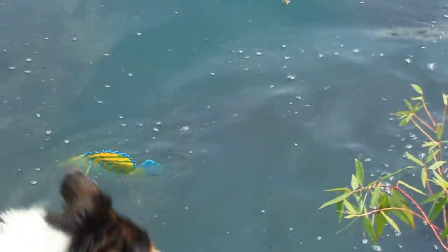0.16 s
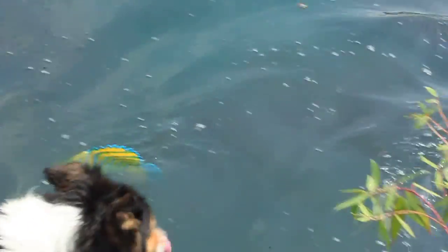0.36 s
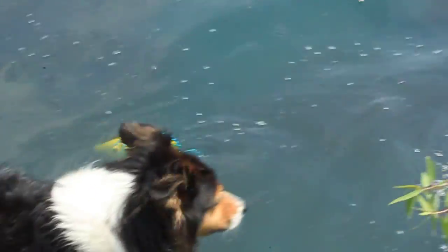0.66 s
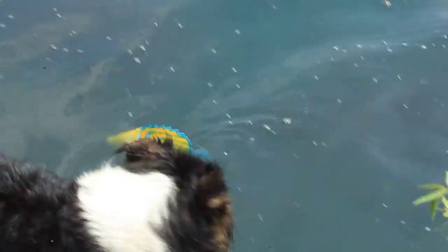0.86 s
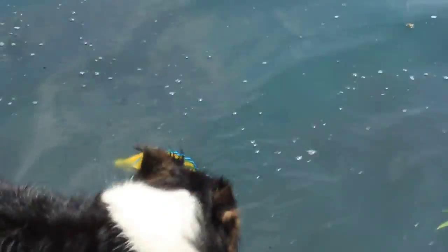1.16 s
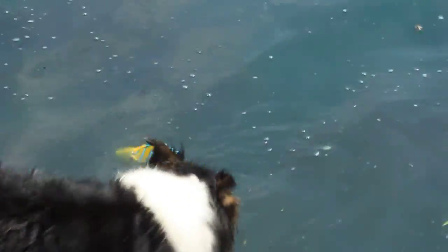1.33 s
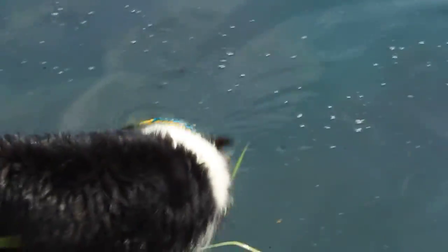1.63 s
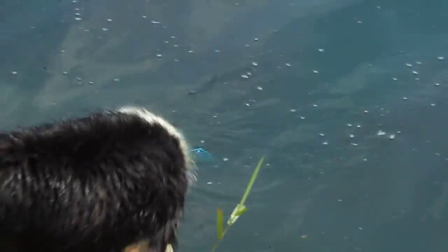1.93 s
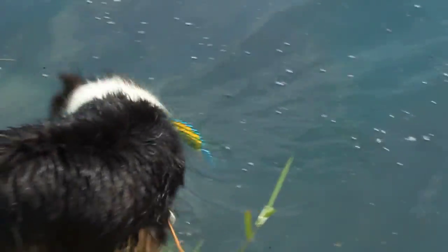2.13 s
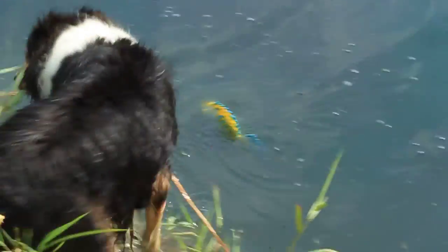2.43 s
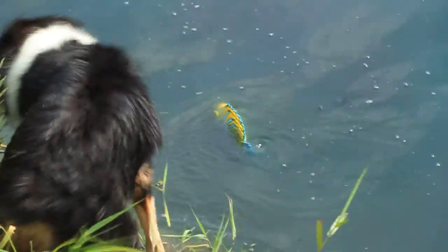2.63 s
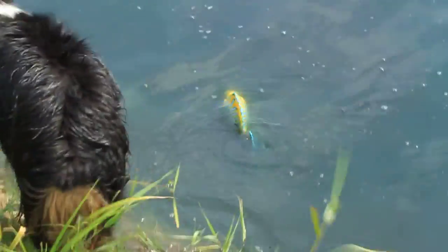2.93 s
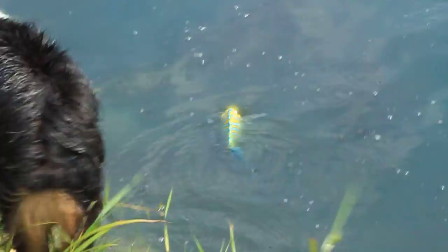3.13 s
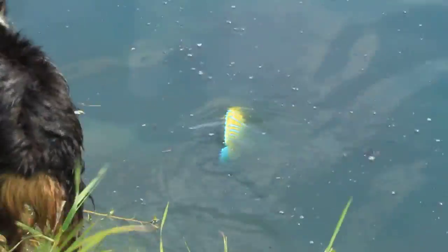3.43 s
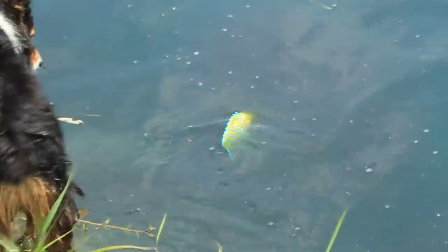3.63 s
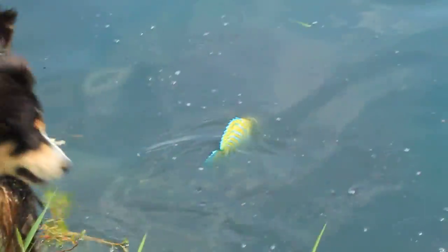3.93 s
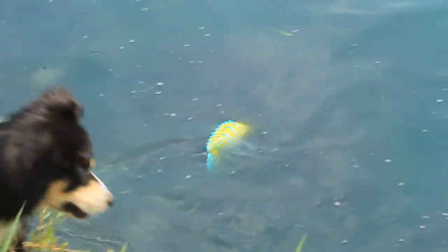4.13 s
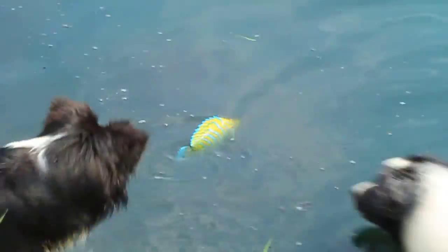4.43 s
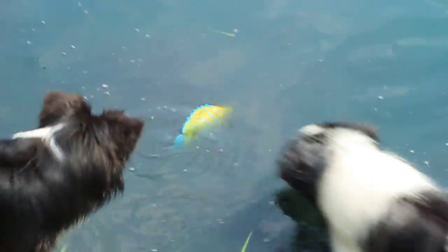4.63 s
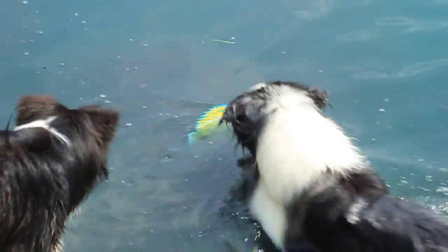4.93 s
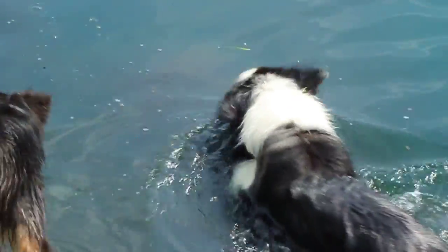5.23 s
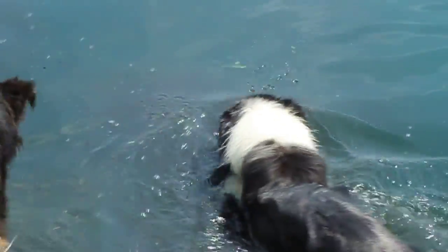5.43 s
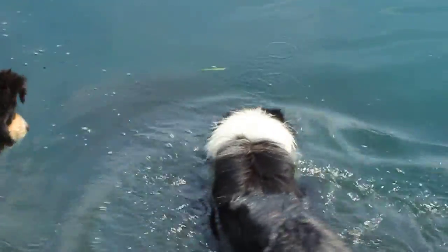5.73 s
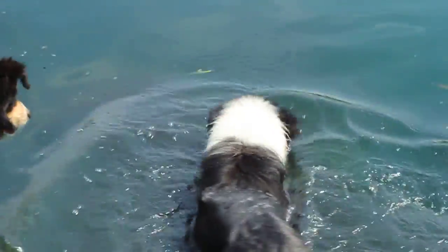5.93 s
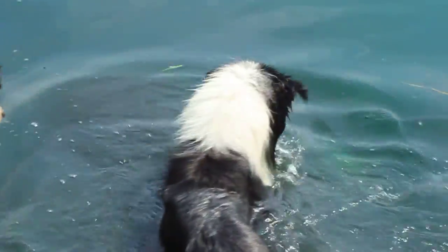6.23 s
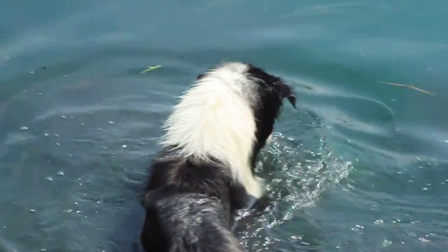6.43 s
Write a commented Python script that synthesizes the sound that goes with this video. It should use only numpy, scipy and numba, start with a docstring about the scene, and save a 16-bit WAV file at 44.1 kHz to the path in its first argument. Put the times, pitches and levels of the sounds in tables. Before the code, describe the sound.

Close, irregular sloshing and bubbly splashes from dogs in shallow water, with wind thumps and a faint bird trill.

```python
"""Lake edge: dogs wade and paddle a step or two from a hand-held camera.
Legs slap and churn the water into ringing bubbles; spray patters back; a few drops tap the camera.
Gusts buffet the microphone. The zoom motor whines faintly near the end.
A small bird trills far off over an outdoor hush."""
import sys
import numpy as np
from scipy import signal
from scipy.fft import rfft, irfft
from scipy.io import wavfile
from numba import njit

SR = 44100
rng = np.random.default_rng(int(sys.argv[2]) if len(sys.argv) > 2 else 0)


def generate_wav(signal):
    """Clip the signal to [-1, 1] and save it as 16-bit WAV at the path in sys.argv[1]."""
    frames = np.transpose(np.atleast_2d(signal))
    scaled = np.clip(frames, -1, 1) * 32767
    pcm = np.round(scaled).astype(np.int16)
    wavfile.write(sys.argv[1], SR, pcm)


N = 289296


def stroke_level_db(layer, attack_s=.071, slosh_per_s=20, slosh_db=1.87):
    """Level of one water layer: leg strokes build, hold and decay over lapping, sloshing unevenly."""
    # leg strokes: start_s, push_s, churn_db, gurgle_db, spray_db
    strokes = [(.53, 0.073, -54, -65, -56), (.68, 0.12, -57, -57, -47.5), (.92, .14, -41, -47, -40),
               (1.2, 0.28, -43.5, -57, -43), (1.62, 0.088, -42, -48.5, -51.5),
               (1.9, .04, -49.5, -53, -50.5), (2.03, 0.1, -42, -49, -50.5),
               (2.28, 0.052, -39.5, -47.5, -44), (2.41, 0.16, -37.5, -44, -48.5),
               (2.65, 0.1, -36, -35.5, -45.5), (2.85, 0.079, -31.5, -40, -41), (2.98, 0.27, -35, -38, -47),
               (3.39, 0.048, -39, -67, -44), (3.6, 0.082, -47.5, -50, -49.5), (3.78, 0.14, -47, -61, -56),
               (4.22, 0.11, -45.5, -50, -52.5), (4.42, 0.14, -48, -43.5, -65), (4.73, .09, -41, -49, -55.5),
               (4.9, 0.18, -41, -44, -53), (5.16, 0.06, -41, -44, -55), (5.42, 0.16, -47.5, -48.5, -53.5),
               (5.72, .03, -49.5, -54, -54), (6.12, 0.19, -47, -50, -55)]
    column, lap_db, release_s, lag_s = {
        "churn": (2, -55, .07, 0), "gurgle": (3, -58, .07, 0), "spray": (4, -54, .19, .0074)}[layer]
    t = np.arange(N) / SR - lag_s
    power = np.full(N, undb(lap_db) ** 2)
    for stroke in strokes:
        start_s, push_s = stroke[:2]
        attack = np.clip(1 + (t - start_s) / attack_s, 0, 1)
        release = np.exp(-np.maximum(t - start_s - push_s, 0) / release_s)
        power += (undb(stroke[column]) * attack * release) ** 2
    slosh = np.tanh(rng.standard_normal(int(slosh_per_s * N / SR)))
    return 10 * np.log10(power) + slosh_db * stretch(slosh, N)


def churn():
    """Stirred water: small bubbles ring over a soft wash."""
    # churn spectrum: freq_hz, gain_db
    spectrum = [(500, -23), (1000, -27.5), (1500, -7.5), (2300, -5.5), (3200, -4.5), (4500, -6.5),
                (6000, -11.5), (7500, -62), (11000, -41)]
    level_db = stroke_level_db("churn")
    air = cloud(level_db, max_per_s=4200, low_hz=1000, high_hz=6500, cycles=22, spread_db=4.4, rise=.22)
    wash = undb(-4) * rng.standard_normal(N)
    return colour(air + wash, spectrum) * undb(level_db - 3.5)


def gurgle():
    """Large air pockets, pushed under by the legs, ring low."""
    level_db = stroke_level_db("gurgle")
    air = cloud(level_db, max_per_s=900, low_hz=413, high_hz=1514, cycles=13, spread_db=4, rise=.29)
    return air * undb(level_db - 4.5)


def spray():
    """Fine drops fall back and tick on the surface."""
    # spray spectrum: freq_hz, gain_db
    spectrum = [(1500, -6.5), (3000, -1.5), (4500, 2), (6000, 2), (7500, -1), (9000, -2.5), (12000, -0.5),
                (14500, -7), (16000, -10)]
    level_db = stroke_level_db("spray")
    ticks = cloud(level_db, max_per_s=4600, low_hz=3110, high_hz=14100, cycles=17, spread_db=3, rise=.1)
    mist = rng.standard_normal(N)
    return colour(ticks + mist, spectrum) * undb(level_db - 1.5)


def splash(length_s, level_db, pitch_hz, fizz_db, cycles=14):
    """A slap tears the surface into short bubbles and fizz, then trickles out."""
    t = np.arange(SR // 10) / SR
    trickle = undb(-16) * np.exp(-40 * t)
    envelope = np.minimum(t / (.49 * length_s), 1) * (np.exp(-(t / length_s) ** 4) + trickle)
    when, ring = rng.random((90, 2)).T
    detune, loud = rng.standard_normal((90, 2)).T
    start_s = when ** 2 * t[-1] * .5  # densest at impact
    gain = np.interp(start_s, t, envelope) * undb(7.6 * loud)
    bubble_hz = np.clip(1.1 * pitch_hz * np.exp(.484 * detune), 800, 9000)
    knot = bubbles(len(t), start_s, bubble_hz, cycles * (.5 + ring), gain, rise=.25)
    ragged_db = 4.5 * np.interp(t, t[::30], rng.standard_normal(len(t[::30])))
    crackle = rng.standard_normal(len(t)) * undb(ragged_db) * envelope
    body = unit(unit(knot) + .5 * unit(band(crackle, pitch_hz * 1.4, pitch_hz * 2.1)))
    fizz = unit(band(crackle * np.minimum(t / length_s, 1), 5000, 15000))
    return (undb(level_db + 2.22) * body + undb(fizz_db + 1) * fizz) * np.sqrt(length_s / t[-1])


def splashes():
    """Paws and sheets of water slap the surface."""
    # slaps: start_s, length_s, level_db, pitch_hz, fizz_db
    slaps = [(.143, .003, -44, 4650, -62), (0.156, 0.0084, -43, 2060, -59),
             (.256, 0.019, -38.5, 4300, -48.5), (.532, 0.0018, -42, 4660, -40),
             (0.554, 0.019, -43, 3120, -66), (.675, .014, -48, 4430, -48), (0.773, 0.011, -40, 3420, -43),
             (0.852, 0.017, -40.5, 3430, -44), (.958, 0.033, -40.5, 3570, -39),
             (1.05, 0.019, -39, 3850, -37.5), (1.315, .008, -38.5, 3770, -51), (1.35, .022, -40, 3650, -47),
             (1.3997, 0.0019, -26, 2000, -26), (1.547, 0.0042, -40, 4240, -36),
             (1.675, 0.012, -35.5, 1820, -39.5), (1.706, 0.01, -31.5, 1970, -54),
             (1.78, 0.0064, -35, 3960, -56), (1.902, .015, -44.5, 2090, -42), (1.935, 0.01, -37, 3370, -44),
             (2.012, 0.0058, -43, 4730, -33.5), (2.056, .004, -37, 1830, -40),
             (2.175, 0.0027, -30.5, 2000, -48), (2.251, 0.013, -40, 3770, -40),
             (2.288, 0.037, -35.5, 2780, -39.5), (2.417, 0.0084, -33, 2320, -50),
             (2.431, 0.0081, -31, 1660, -38), (2.449, 0.01, -30, 2460, -48),
             (2.503, 0.024, -33, 3300, -42.5), (2.66, 0.015, -27, 2260, -42),
             (2.748, 0.014, -36.5, 3130, -44), (2.815, 0.0044, -31.5, 3420, -41),
             (2.848, 0.013, -40, 3500, -36.5), (2.893, 0.0033, -19, 1620, -31.5),
             (3.282, 0.016, -37, 3040, -41), (3.435, 0.01, -36, 4250, -50), (3.457, 0.033, -42, 3700, -48),
             (4.317, 0.0022, -35, 3700, -47.5), (4.5, 0.0032, -26, 3050, -32.5),
             (4.504, 0.014, -37, 3630, -52.5), (4.729, 0.033, -34.5, 2480, -49),
             (4.978, 0.0034, -35, 2800, -35.5), (5.034, 0.0039, -36.5, 1580, -45),
             (5.056, 0.0094, -34.5, 2320, -46), (5.217, 0.007, -36, 2690, -45),
             (5.386, 0.017, -39, 2920, -38), (5.518, 0.026, -43, 2260, -60),
             (5.556, 0.0053, -35, 1890, -40), (5.792, .008, -41, 2950, -53),
             (5.951, 0.021, -47, 3260, -48.5), (6.144, 0.013, -42.5, 3530, -52),
             (6.291, 0.0043, -35, 1950, -44.5)]
    out = np.zeros(N)
    for start_s, *slap in slaps:
        add(out, start_s, splash(*slap))
    return out


def plops(rise=.45):
    """Single large bubbles ring; each sheds three lesser ones."""
    # large bubbles: start_s, level_db, pitch_hz, ring_cycles
    large_bubbles = [(0.186, -26.5, 2260, 21), (.295, -18, 2300, 18), (0.564, -23.5, 3000, 35),
                     (.6425, -18.5, 5700, 26), (1.4, -15, 362, 3.6), (1.644, -24.5, 2000, 24),
                     (1.684, -21, 875, 12), (1.706, -19, 1180, 23), (1.959, -20.5, 1060, 18),
                     (1.967, -20.5, 1170, 15), (2.02, -21, 4900, 48), (2.178, -18, 1900, 8.2),
                     (2.429, -15.5, 1210, 16), (2.437, -19, 880, 17), (2.667, -13, 1970, 12),
                     (2.877, -17.5, 800, 24), (3.6, -34.5, 810, 55), (4.129, -28, 2150, 28),
                     (4.288, -32.5, 1700, 150), (4.452, -32, 1490, 74), (4.749, -22.5, 1460, 22),
                     (4.911, -28, 1580, 34), (4.816, -30.5, 1460, 36), (5.036, -16.5, 865, 5.4),
                     (5.165, -31, 1450, 27), (5.222, -22, 1020, 5.2), (5.377, -22, 1440, 13),
                     (5.558, -22.5, 1590, 20), (5.975, -17, 4420, 30)]
    start_s, level_db, pitch_hz, cycles = np.array(large_bubbles, float).T.copy()
    out = bubbles(N, start_s, pitch_hz, cycles, undb(level_db), rise)
    for _ in range(3):
        late, detune = rng.random((len(start_s), 2)).T
        shed_hz = pitch_hz * (.8 + detune)
        out += bubbles(N, start_s + .01 * late, shed_hz, .5 * cycles, undb(level_db - 9), rise)
    return out


def gulps(waver=.062, flutter_db=4.1):
    """Air in a hollow around a leg rings: pitch rises as it shrinks, falls as it widens."""
    # hollows: start_s, length_s, level_db, first_hz, last_hz
    hollows = [(3.728, 0.035, -49, 802, 1250), (3.94, 0.036, -48, 1435, 2130),
               (4.156, 0.051, -38.5, 408, 363), (4.35, 0.11, -37.5, 335, 539), (4.893, 0.11, -43, 250, 544),
               (4.981, 0.11, -43.5, 1016, 737), (5.256, 0.04, -41, 836, 650),
               (5.301, 0.046, -41.5, 361, 262), (5.42, 0.051, -45.5, 525, 382),
               (6.092, 0.049, -43.5, 513, 1134), (6.194, 0.026, -44.5, 984, 1130)]
    out = np.zeros(N)
    for start_s, length_s, level_db, first_hz, last_hz in hollows:
        age = np.linspace(0, 1, int(length_s * SR))
        wobble, flutter = (stretch(row, len(age)) for row in rng.standard_normal((2, 9)))
        pitch_hz = first_hz * (last_hz / first_hz) ** age * (1 + waver * wobble)
        envelope = undb(level_db + flutter_db * flutter) * np.sin(np.pi * age)
        add(out, start_s, envelope * np.sin(2 * np.pi * np.cumsum(pitch_hz) / SR))
    return out


def flicks(per_s=4):
    """Small random slaps, as loud as the churn and spray around them."""
    out = np.zeros(N)
    churn_db, spray_db = stroke_level_db("churn"), stroke_level_db("spray")
    for when, *draws in rng.random((int(per_s * N / SR), 5)):
        i = int(when * N)
        loud, long, high, wet = 2 * np.array(draws) - 1
        slap = splash(length_s=.0052 * 2 ** long, level_db=churn_db[i] + .5 + 3 * loud,
                      pitch_hz=3030 * 2 ** (.5 * high), fizz_db=spray_db[i] + 5 * wet)
        add(out, i / SR, slap)
    return out


def drips(scatter_db=4):
    """Lone drops, each trapping one clear bubble."""
    # drop classes: rate_per_s, low_hz, high_hz, ring_cycles, over_churn_db
    drop_classes = [(12, 900, 2310, 34, 8), (14, 2690, 7000, 35, 11)]
    out, churn_db = np.zeros(N), stroke_level_db("churn")
    for per_s, low_hz, high_hz, cycles, over_db in drop_classes:
        when, pitch, ring, loud = rng.random((int(per_s * N / SR), 4)).T
        gain = undb(churn_db[(when * N).astype(int)] + over_db + scatter_db * (2 * loud - 1.5))
        pitch_hz = low_hz * (high_hz / low_hz) ** pitch
        out += bubbles(N, when * N / SR, pitch_hz, cycles * (.5 + ring), gain, rise=.6)
    return out


def cloud(level_db, max_per_s, low_hz, high_hz, cycles, spread_db, rise):
    """Random bubbles, many faint and a few loud, denser where the water is louder; rms 1."""
    when, pitch, ring, faint, lottery = rng.random((int(max_per_s * N / SR), 5)).T
    density = undb(.8 * (level_db[(when * N).astype(int)] - level_db.max()))
    pitch_hz = low_hz * (high_hz / low_hz) ** pitch
    gain = undb(-spread_db * np.log(faint + .02)) * pitch_hz / np.sqrt(density)
    kept = lottery < density
    start_s = when[kept] * N / SR
    return unit(bubbles(N, start_s, pitch_hz[kept], cycles * (.5 + ring[kept]), gain[kept], rise))


@njit
def bubbles(samples, start_s, pitch_hz, cycles, gain, rise):
    """Sines that decay 60 dB and go sharp by the fraction `rise` as they near the surface."""
    out = np.zeros(samples)
    for k in range(len(start_s)):
        first, life = int(start_s[k] * SR), cycles[k] / pitch_hz[k] * SR
        phase = 0.
        for i in range(min(int(life), samples - first)):
            age = i / life
            phase += 2 * np.pi * min(pitch_hz[k] * (1 + rise * age), .45 * SR) / SR
            envelope = (1 - np.exp(-phase / np.pi)) * np.exp(-6.9 * age)
            out[first + i] += gain[k] * envelope * np.sin(phase)
    return out


def taps(tick_db=-12, tick_s=.00044):
    """Drops tick on the camera and briefly ring its body."""
    # drop impacts: start_s, level_db
    impacts = [(.889, -3.5), (0.9134, -8), (0.9505, -5.5), (1.1613, -3), (2.894, -7), (3.256, -3.5)]
    # camera body modes: freq_hz, level_db, t60_s
    modes = [(736, -8, 0.017), (1058, 10.5, 0.012), (1470, 9.5, 0.018), (1920, -0.5, 0.02),
             (2300, 7, 0.022), (3650, 4.5, 0.0058), (5220, -2.5, 0.0093)]
    out, t = np.zeros(N), np.arange(SR // 20) / SR
    for start_s, level_db in impacts:
        ring = np.zeros(len(t))
        for k, (freq_hz, mode_db, t60_s) in enumerate(modes):
            tone = np.sin(2 * np.pi * freq_hz * (1 + .02 * rng.standard_normal()) * t)
            ring += (-1) ** k * undb(mode_db - 60 * t / t60_s) * tone  # opposed signs slow the onset
        tick = undb(tick_db) * rng.standard_normal(len(t)) * np.exp(-t / tick_s)
        add(out, start_s, undb(level_db - 6) * (ring / np.abs(ring).max() + tick))
    return band(out, 620, 15000)  # small shell, no bass


def wind(lumps_per_s=45, eddy_cycles=.45):
    """Lumpy turbulence at the microphone port; each eddy is one short pressure swing."""
    # rumble spectrum: freq_hz, gain_db
    spectrum = [(20, -11), (45, -18), (70, 2), (110, 3.5), (200, -2), (300, -12), (450, -23), (700, -33),
                (1200, -75)]
    gust_db = gust_level_db()
    lumps = rng.standard_normal(int(lumps_per_s * N / SR))
    lumps_db = 6 * np.tanh(stretch(lumps, N))
    rumble = colour(rng.standard_normal(N) * undb(lumps_db), spectrum) * undb(gust_db + 1.9)
    slow_eddies = unit(band(rng.standard_normal(N), 39, 58.5)) * undb(-34 + .5 * gust_db)
    out = rumble + slow_eddies
    t = np.arange(-SR // 40, SR // 40) / SR
    for centre_s, level_db, pitch_hz in eddies(gust_db):
        window = 1 / np.cosh(np.clip(2 * pitch_hz * t / eddy_cycles, -20, 20))
        swing = np.cos(2 * np.pi * (pitch_hz * t + rng.random()))
        add(out, centre_s + t[0], undb(level_db) * window * swing)
    return out


def gust_level_db(breeze_db=-59.5):
    """Wind level: bell-shaped gusts over a light breeze."""
    # gusts: crest_s, half_width_s, level_db
    gusts = [(0.022, 0.031, -43), (.45, 0.063, -45), (.72, 0.019, -51), (1.68, 0.057, -49),
             (1.89, .05, -41), (2.2, 0.13, -37), (2.46, 0.077, -34), (2.68, 0.064, -33), (2.95, 0.23, -29),
             (3.149, 0.15, -25), (3.38, 0.15, -38.5), (3.748, 0.068, -29), (4.06, 0.041, -37.5),
             (4.27, 0.065, -33.5), (4.43, 0.1, -31.5), (4.8, 0.13, -35.5), (5.08, 0.042, -41),
             (5.3, 0.037, -38), (5.979, 0.063, -33), (6.16, 0.097, -40.5), (6.41, 0.17, -37)]
    t = np.arange(N) / SR
    power = sum((undb(level_db) * np.exp(-((t - crest_s) / half_width_s) ** 2)) ** 2
                for crest_s, half_width_s, level_db in gusts)
    return 10 * np.log10(power + undb(breeze_db) ** 2)


def eddies(gust_db, per_s=18, eddy_hz=215, octaves_per_db=.034, wake_s=.00698, wake_db=-7):
    """Hard thumps, their wakes, and random eddies that are louder and quicker in harder gusts."""
    # hardest wind thumps: centre_s, level_db, pitch_hz
    buffets = [(0.273, -25, 111), (0.481, -11.5, 139), (.9, -24, 109), (1.595, -17.5, 134),
               (1.863, -17, 142), (1.949, -19, 112), (2.15, -22.5, 117), (2.232, -22, 98),
               (3.007, -13, 214), (3.076, -7.5, 200), (3.118, -7, 211), (3.127, -5.5, 199),
               (3.184, -10.5, 193), (3.202, -3.5, 210), (3.225, -14, 174), (3.273, -14.5, 127),
               (3.351, -14.5, 136), (3.525, -20.5, 138), (3.676, -11, 196), (3.756, -9.5, 158),
               (3.795, -15, 161), (4.276, -13, 216), (4.408, -13, 156), (4.438, -11.5, 226),
               (5.999, -16, 178), (6.432, -17, 194)]
    rows = list(buffets)
    for centre_s, level_db, pitch_hz in buffets:
        late, pitch = rng.random(2)
        rows.append((centre_s + wake_s * (.5 + late), level_db + wake_db, pitch_hz * 2 ** (pitch - .5)))
    for when, pitch in rng.random((int(per_s * N / SR), 2)):
        level_db = gust_db[int(when * N)]
        octaves = pitch - .5 + octaves_per_db * (level_db - gust_db.max())
        rows.append((when * N / SR, level_db + 5.5, eddy_hz * 2 ** octaves))
    return rows


def zoom_motor(start_s=4.95, attack_s=.19, sag_per_s=.0018, fade_db_per_s=3):
    """A faint whine sinks and softens as the lens travels."""
    # motor tones: freq_hz, level_db
    tones = [(7430, -55.5), (7610, -78), (7820, -64), (8245, -58.5), (8452, -74), (8872, -71)]
    t = np.arange(N) / SR - start_s
    travel_s = np.cumsum(1 - sag_per_s * (t - .5)) / SR
    whine = sum(undb(db - 3.5) * np.sin(2 * np.pi * hz * travel_s) for hz, db in tones)
    return np.clip(t / attack_s, 0, 1) * undb(-fade_db_per_s * t) * whine


def bird(droop=.116, echo_decay_s=.02, echo_db=-12):
    """Each note holds a thin whistle, then slurs down; the bank scatters a short echo."""
    # trill runs: first_s, last_s, notes_per_s, top_hz, level_db
    runs = [(1.556, 3.53, 18.75, 7550, -52), (3.595, 5.004, 18.42, 7620, -47.5),
            (5.06, 5.676, 17.87, 7620, -47), (5.742, 6.531, 16.48, 7130, -51.5)]
    out, t = np.zeros(N), np.arange(-SR // 40, SR // 40) / SR
    slur = 1 - droop * np.tanh(np.maximum(t, 0) / .01) ** 2 + 1.8 * np.minimum(t, 0)
    swell = np.interp(t, [-.011, -.005, 0, .005, .009, .016], [0, .6, 1, .45, .75, 0])
    for first_s, last_s, per_s, top_hz, level_db in runs:
        for note_s in np.arange(first_s, last_s + .5 / per_s, 1 / per_s):
            detune, loud, late, lean = rng.standard_normal(4)
            whistle = np.sin(2 * np.pi * np.cumsum(top_hz * (1 + .007 * detune) * slur) / SR)
            envelope = undb(level_db + loud + 200 * lean * t) * swell
            add(out, note_s + t[0] + .001 * late, envelope * whistle)
    bank = rng.standard_normal(SR // 5) * np.exp(-np.arange(SR // 5) / SR / echo_decay_s)
    return out + undb(echo_db) * signal.fftconvolve(out, bank / np.linalg.norm(bank))[:N]


def hush(level_db=-48):
    """Steady outdoor noise."""
    # hush spectrum: freq_hz, gain_db
    spectrum = [(15, -35), (25, 1.5), (70, 7.5), (153, -10), (309, -4), (659, -11), (962, -9.5),
                (1260, -13), (3250, -15), (3520, -13), (7110, -24.5), (9320, -32.5), (14000, -16.5),
                (16000, -25)]
    return colour(rng.standard_normal(N), spectrum) * undb(level_db)


def undb(db):
    """Decibels to gain."""
    return 10 ** (np.asarray(db) / 20)


def unit(x):
    """Scale to rms 1."""
    return x / np.sqrt(np.mean(x ** 2) + 1e-20)


def stretch(values, samples):
    """Interpolate evenly spaced values to a new length."""
    return np.interp(np.linspace(0, len(values) - 1, samples), np.arange(len(values)), values)


def add(track, start_s, sound):
    """Mix a sound into the track."""
    i = max(int(start_s * SR), 0)
    part = sound[:max(len(track) - i, 0)]
    track[i:i + len(part)] += part


def colour(x, spectrum):
    """Filter by (freq_hz, gain_db) points; rms 1."""
    freq_hz, gain_db = np.transpose(spectrum)
    bin_hz = np.maximum(np.arange(len(x) // 2 + 1) * SR / len(x), 1)
    gain = undb(np.interp(np.log(bin_hz), np.log(freq_hz), gain_db))
    return unit(irfft(rfft(x) * gain, len(x)))


def band(x, low_hz, high_hz):
    """Gentle causal band-pass."""
    return signal.sosfilt(signal.butter(2, [low_hz, high_hz], "band", fs=SR, output="sos"), x)


def scene():
    """Water close by, wind and small noises on the camera, bird and hush behind; mono."""
    background = hush()
    water = gurgle() + churn() + spray() + splashes() + plops() + gulps() + flicks() + drips()
    return (water + taps() + wind() + zoom_motor() + bird() + background)[None]


def record(dry, low_hz=30, top_hz=16000):
    """The camera thins the deep bass and cuts the top."""
    thinned = signal.sosfilt(signal.butter(1, low_hz, "high", fs=SR, output="sos"), dry)
    return signal.sosfilt(signal.ellip(10, .2, 80, top_hz, fs=SR, output="sos"), thinned)


dry = scene()
out = record(dry)
generate_wav(out)
```